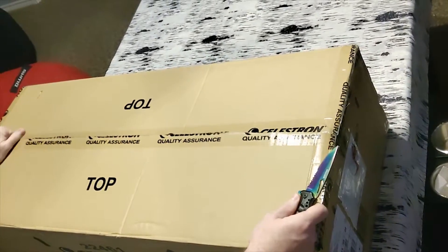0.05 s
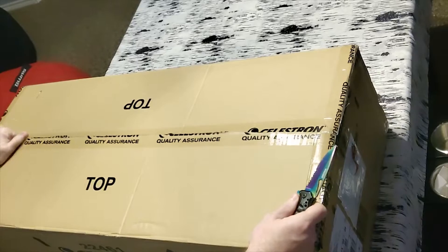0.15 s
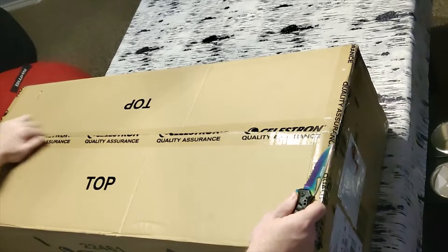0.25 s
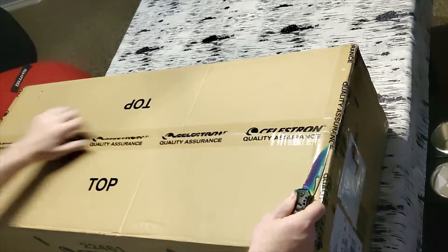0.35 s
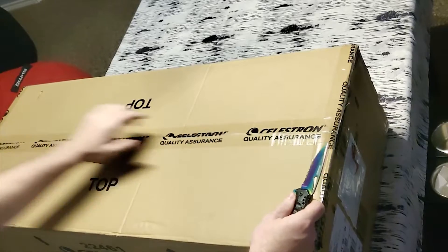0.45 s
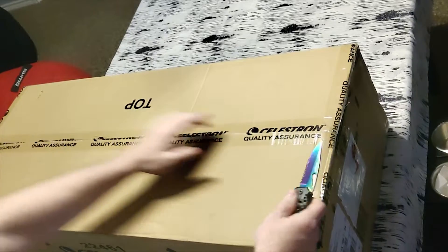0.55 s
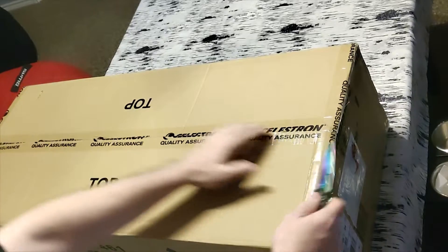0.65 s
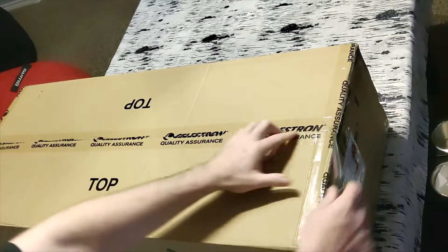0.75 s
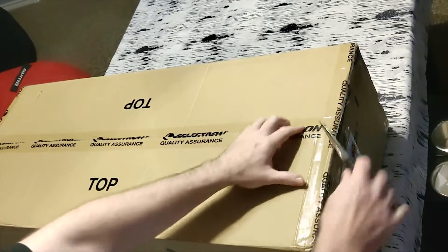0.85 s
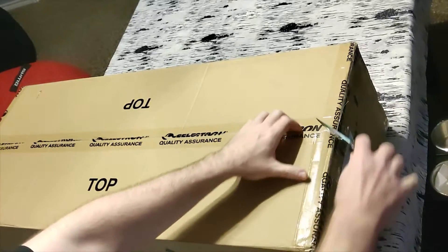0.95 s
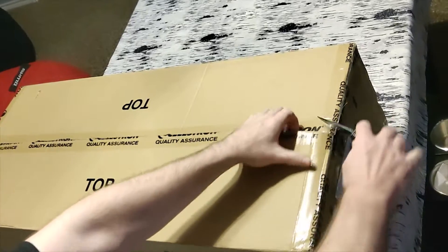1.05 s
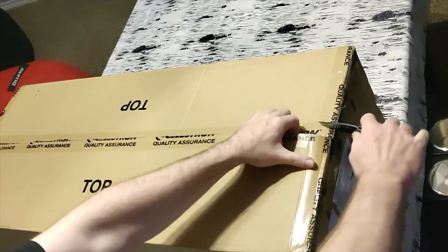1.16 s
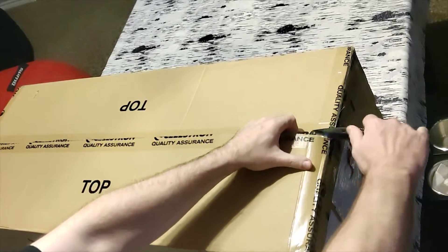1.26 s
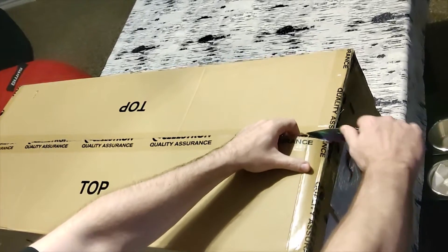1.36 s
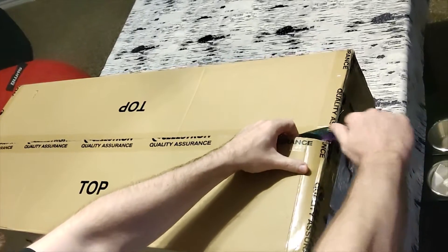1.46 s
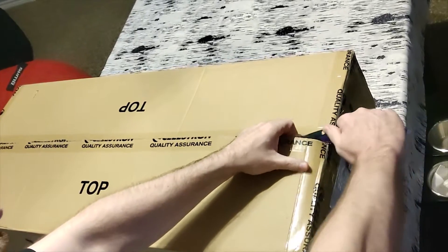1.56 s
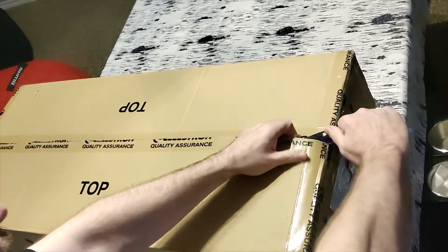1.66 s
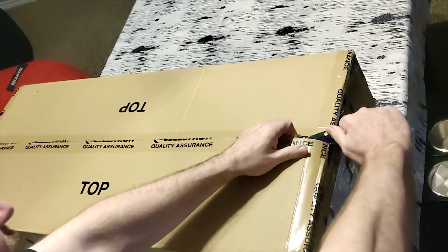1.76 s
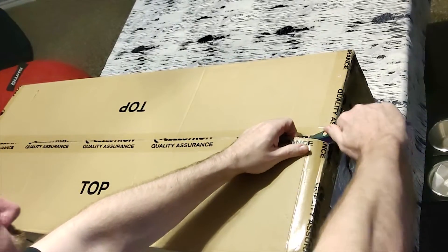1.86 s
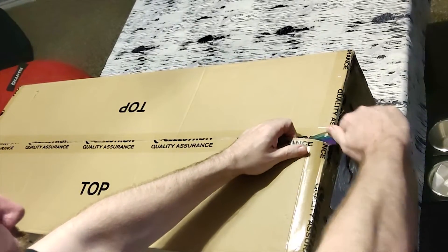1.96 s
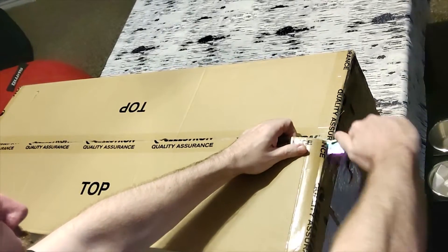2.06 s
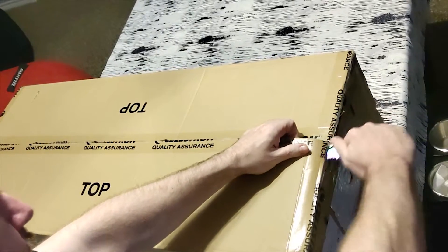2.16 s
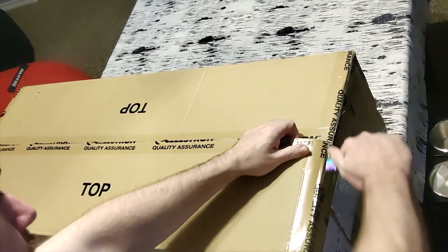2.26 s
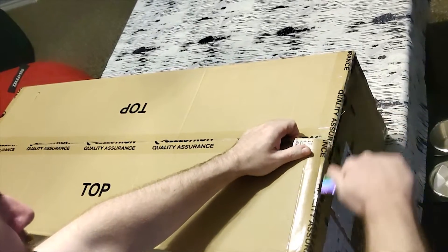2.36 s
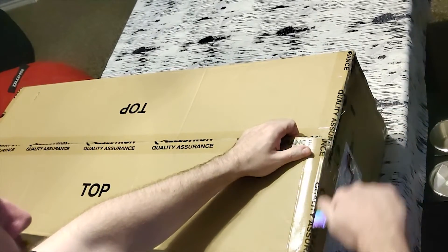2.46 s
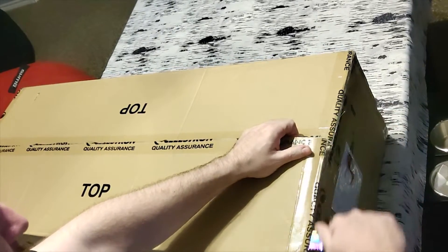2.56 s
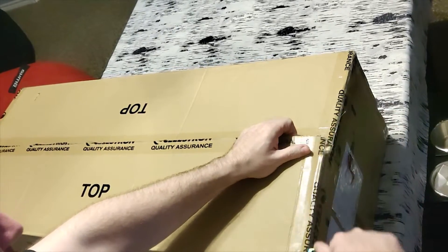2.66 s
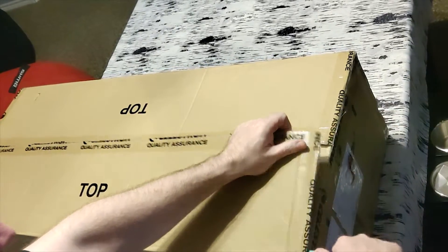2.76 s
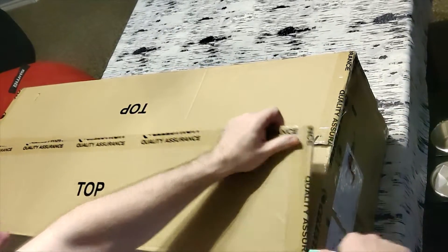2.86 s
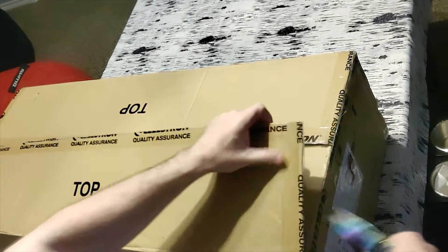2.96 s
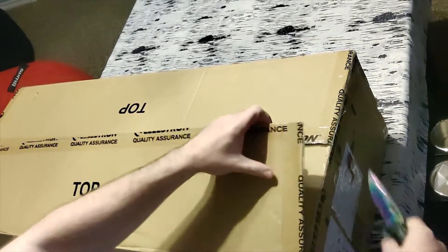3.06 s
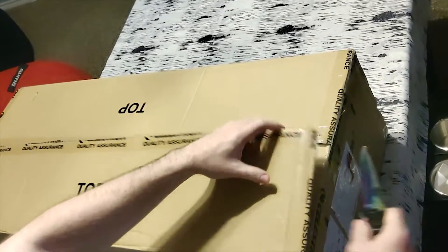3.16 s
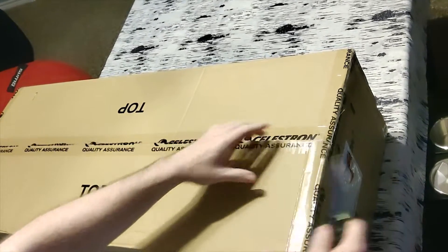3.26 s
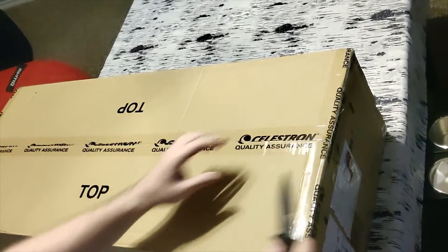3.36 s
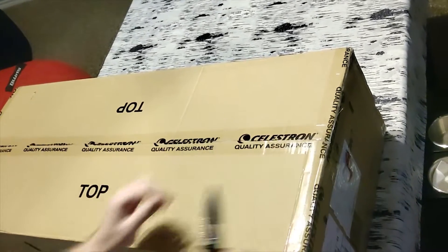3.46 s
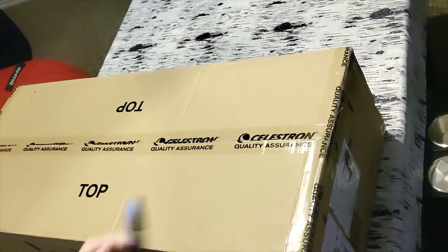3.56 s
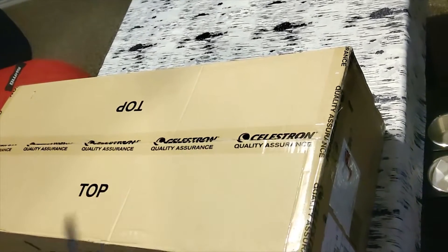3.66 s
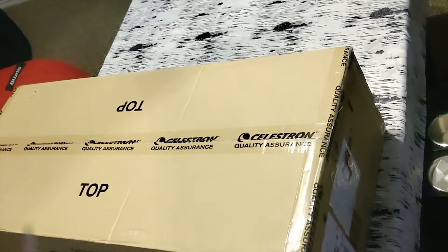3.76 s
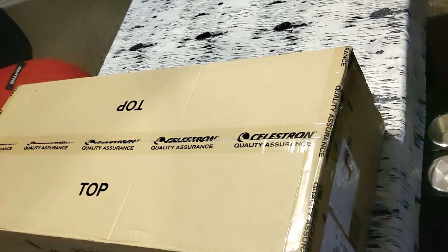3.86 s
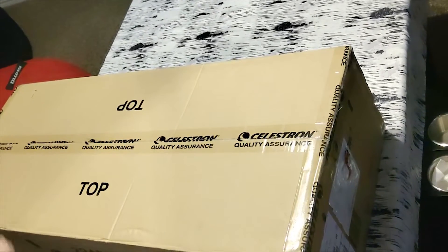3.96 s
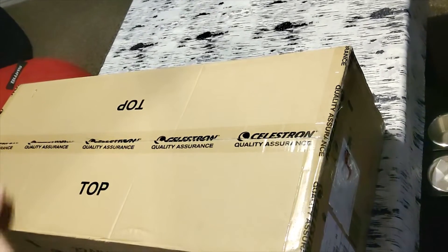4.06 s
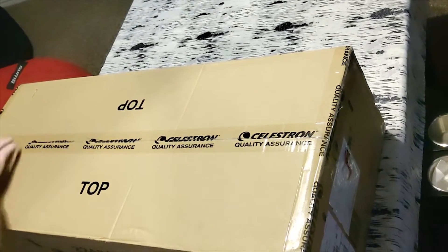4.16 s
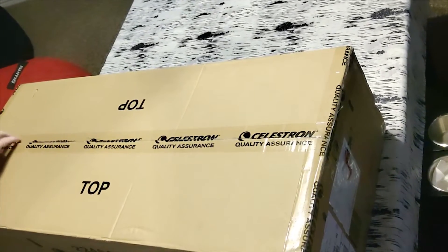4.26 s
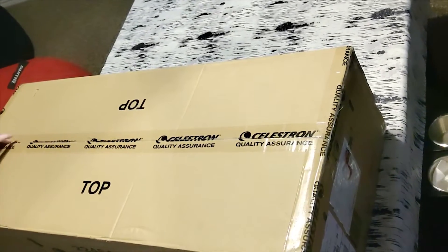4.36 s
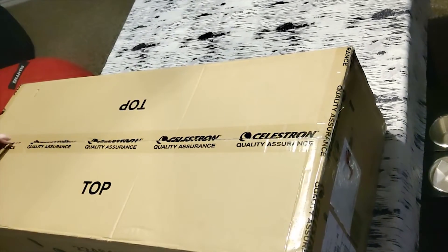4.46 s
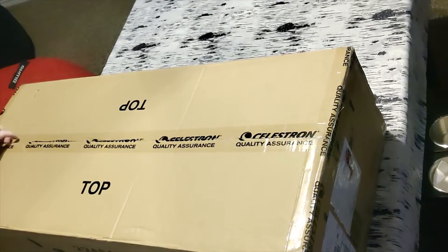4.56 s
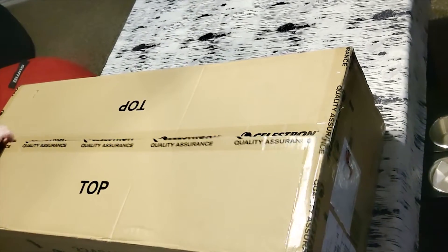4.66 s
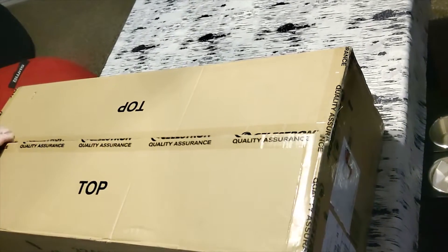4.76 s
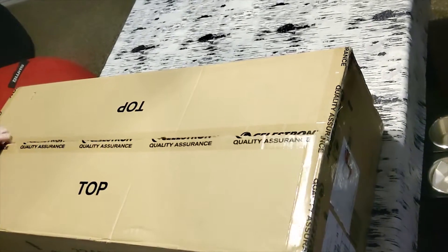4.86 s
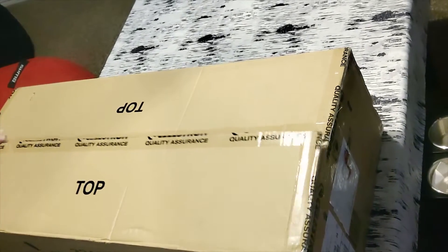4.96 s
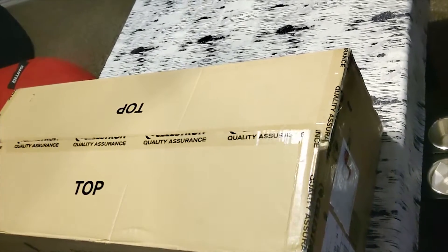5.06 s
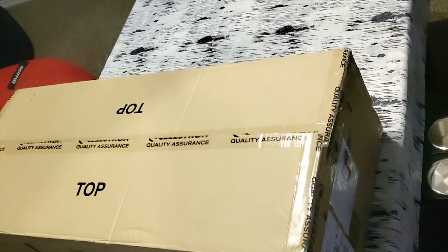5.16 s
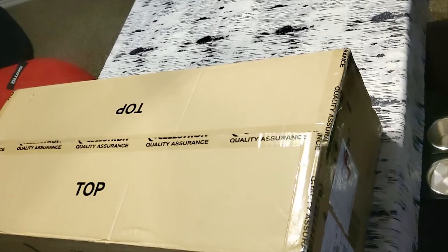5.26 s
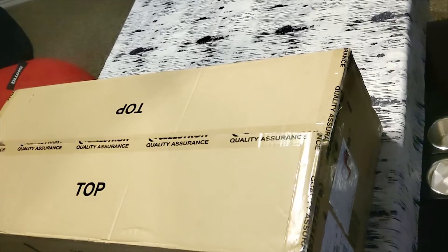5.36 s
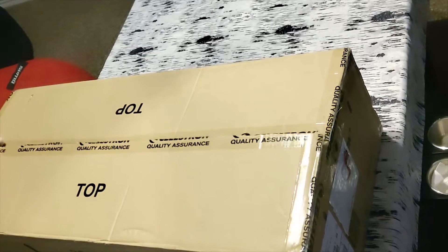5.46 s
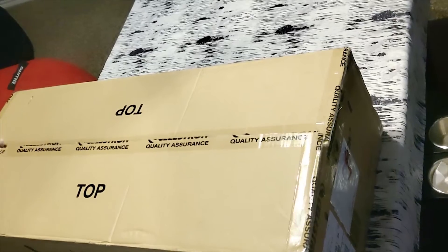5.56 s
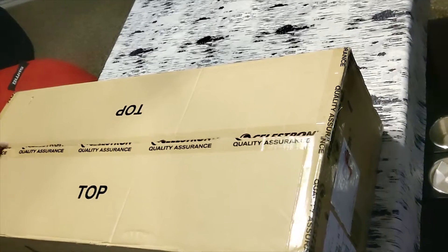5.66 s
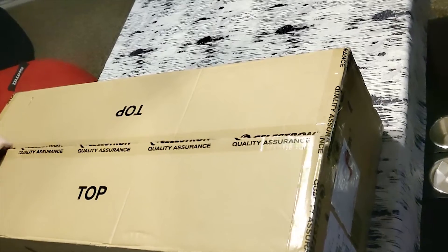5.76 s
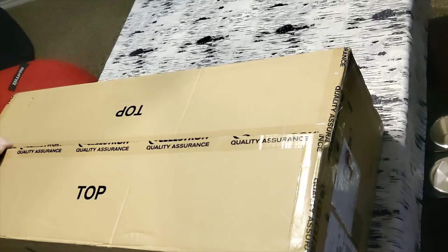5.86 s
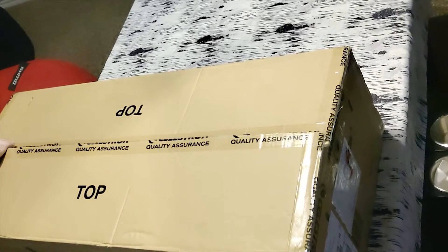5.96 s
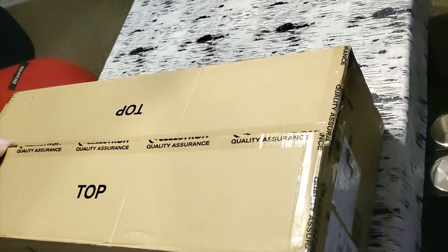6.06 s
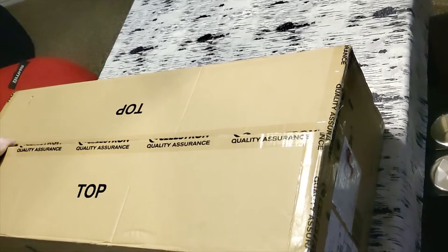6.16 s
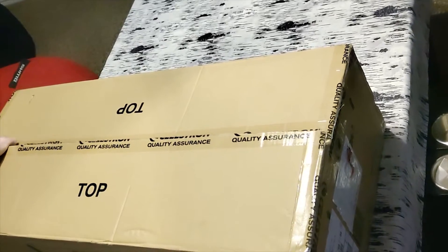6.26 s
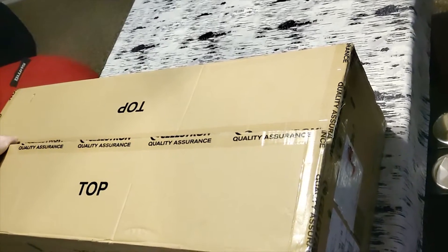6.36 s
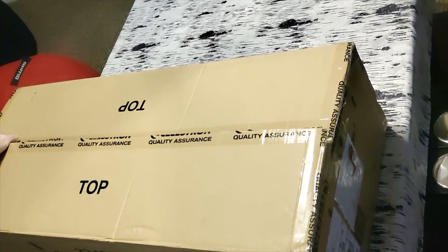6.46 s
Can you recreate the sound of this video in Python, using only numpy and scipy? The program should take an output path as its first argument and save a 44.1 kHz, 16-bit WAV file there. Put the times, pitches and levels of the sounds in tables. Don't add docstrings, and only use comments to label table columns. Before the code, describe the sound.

A large hollow cardboard box is cut open indoors, heard close in stereo with very faint ventilation hiss. At 0 s a bright tape snap and short scrape, then light fingertip whisks and tiny ticks around 0.2-0.9 s. From 1.0 to 1.25 s a rapid cluster of sharp cracks, leaning left. Faint ticks and creaks follow until 2.1 s, when the loudest crack bursts with a brief boxy ring and low thump; smaller snaps at 2.2-2.4 s and 2.5-2.65 s. Papery drags and soft knocks run 2.6-3.3 s. It is nearly quiet to 4.5 s, with a dull knock at 4.3 s. Then farther, roomier pops crackle at 4.6-4.9, 5.03-5.07 and 5.35-5.45 s, with brief rasps at 5.1 and 5.5 s. Quiet again, until a last double snap at 6.45 s. Echoes are short, tails cut off.

```python
import sys
import numpy as np
from scipy import signal
from scipy.fft import rfft, irfft
from scipy.io import wavfile

SR = 44100
rng = np.random.default_rng(int(sys.argv[2]) if len(sys.argv) > 2 else 0)


def voltage_ratio(decibels):
    exponent = np.asarray(decibels, float) / 20
    return 10 ** exponent


def wav_record(signal):
    frames = np.transpose(np.atleast_2d(signal))
    bounded = np.clip(frames, -1, 1)
    quanta = np.round(bounded * 32767).astype(np.int16)
    wavfile.write(sys.argv[1], SR, quanta)


N = 287532
TIME_S = np.arange(N) / SR

# start in seconds, peak in dB, box ring in Hz, crack re ring in dB, room send in dB.
SLITS = [(0.002, -32, 770, -9.5, 5), (0.044, -17, 1600, -41, -16.5), (0.997, -37, 1320, 2.5, -18),
         (1.041, -37, 1050, -15, 1), (1.0645, -19, 1540, -20, -13), (1.0801, -12, 1480, -20, -6.5),
         (1.1251, -22.5, 2360, -6.5, -16), (1.142, -21.5, 2580, -9, -6), (1.157, -14.5, 1450, -14.5, -5),
         (1.229, -32.5, 820, -2.5, -19), (2.064, -33.5, 1160, -10.5, -3.5), (2.095, -21.5, 760, -19.5, 2.5),
         (2.1144, -3.5, 883, -18.5, -4.5), (2.229, -27.5, 980, 4, -8), (2.255, -22, 1530, -1.5, -10.5),
         (2.26, -24, 780, -7.5, 1), (2.359, -18.5, 1950, -20.5, -7.5), (2.365, -22.5, 1440, -8, -8),
         (2.374, -34, 1490, -12, -13), (2.541, -27, 1130, -13, -7), (2.618, -30.5, 1940, -17, 3),
         (2.626, -23.5, 2220, -25, -18), (2.961, -34.5, 1630, -17.5, -8), (3.28, -34.5, 1540, -9, 1)]
POPS = [(4.584, -20, 1620, -13.5, -8.5), (4.64, -20, 1540, -12.5, -45), (4.698, -50.5, 996, 5, -11),
        (4.735, -36.5, 640, -19, 7), (4.747, -27.5, 830, -1, -2.5), (4.766, -17.5, 890, -4.5, -6.5),
        (4.800, -10, 1160, -8.5, -6.5), (4.818, -14, 1490, -11, -25), (4.867, -26.5, 1650, -3, -10.5),
        (4.886, -34, 2300, -2.5, -19), (4.957, -41, 1370, -20, -22), (5.031, -19, 1460, -11.5, -1),
        (5.0487, -13.5, 757, -7, -5.5), (5.067, -12, 1250, -17.5, -4.5), (5.299, -42.5, 830, -31, -3),
        (5.35, -20, 1675, -15.5, -12.5), (5.413, -10.5, 890, -8, -1.5), (5.434, -27, 1140, -13.5, 3.5),
        (5.619, -38, 786, -33, -8), (5.979, -50.5, 965, -19.5, -6.5), (6.44, -13.5, 1062, -20, -4),
        (6.457, -17.5, 1420, -40, -5)]
# start in seconds, peak in dB, box ring in Hz, crack re ring in dB.
TICKS = [(0.022, -42, 600, -29), (0.284, -35, 740, -30), (0.412, -49, 797, -3), (0.706, -45.5, 1540, -22),
         (0.85, -52, 900, -12), (0.899, -44.5, 880, 2.5), (0.989, -48, 1010, -7), (1.314, -43, 1150, -17),
         (1.346, -39, 1560, -9.5), (1.433, -43, 870, -13), (1.591, -46, 1550, -9), (1.737, -47, 557, -13),
         (1.854, -40, 910, -30), (1.887, -33.5, 855, -26), (1.928, -37, 830, -25), (2.048, -47.5, 1610, -7),
         (2.089, -58, 695, 15), (2.465, -50, 755, 7), (2.582, -44, 1110, -3.5), (2.597, -44, 850, -14),
         (2.748, -36.5, 960, -4), (2.9305, -44.5, 865, 9), (3.311, -35.5, 825, -15),
         (4.055, -39, 1730, -45), (4.303, -46.5, 930, -11), (5.591, -58, 800, -20.5),
         (5.893, -57, 523, -14), (5.991, -48, 837, -23), (6.235, -56, 512, -16)]
TICK_ROOM_DB = -3.5
# start in seconds, peak in dB, pitch in
# Hz, t60 in seconds, room send in dB.
OVERTONES = [(.005, -43, 644, 0.11, 0), (1.0657, -25, 1560, .006, -14), (1.0735, -32, 1500, .009, -10),
             (1.0793, -30, 2400, .004, -8), (1.0813, -24, 2530, 0.0038, -6), (1.088, -29, 1250, .009, -16),
             (1.1665, -27, 1620, .01, -10), (2.1228, -30, 6000, .004, -8), (5.032, -26, 1400, .008, -14),
             (5.446, -28, 950, .01, -12), (2.739, -42, 1410, .008, -4), (2.1172, -11.5, 684, 0.022, -14),
             (2.1167, -15.5, 1950, 0.0065, -11.5), (2.1163, -17, 4250, 0.006, -6),
             (2.231, -41, 3520, 0.0076, -23), (2.543, -29, 1950, 0.006, -8),
             (2.5825, -36, 2080, 0.0076, -3), (4.642, -28, 2650, 0.01, -13),
             (5.0508, -25, 1300, 0.013, -10), (2.115, -27, 1500, 0.015, -3),
             (4.587, -36.5, 1300, 0.0077, -2), (5.413, -22.5, 1265, 0.038, -20),
             (6.442, -30.5, 698, 0.015, 1), (6.443, -38.5, 545, 0.039, -2), (2.752, -45.5, 303, 0.06, -6),
             (6.443, -18.5, 1600, 0.0059, -18)]
# start in seconds, peak in dB, pitch in Hz,
# room send in dB.
FLECKS = [(.411, -47, 5300, -8), (1.0195, -39, 6200, -8), (1.0265, -45, 6500, -10), (1.046, -48, 6800, -8),
          (1.0828, -31, 6900, 3), (1.073, -32, 3500, -6), (1.143, -23.5, 2980, -15),
          (1.158, -32, 3480, -17), (2.2298, -27, 3720, -12), (2.273, -38, 4500, -13),
          (4.82, -18.5, 6200, -2), (1.1264, -26, 6830, -14), (1.1267, -28, 3400, -16),
          (4.768, -38, 14200, 0), (5.051, -32, 14300, 6), (5.069, -33, 4000, -8), (2.542, -40.5, 5030, -14),
          (3.29, -55, 13600, 4), (1.2305, -40, 7360, -8), (2.059, -51.5, 7990, -10.5),
          (2.089, -40.5, 9370, -5.5), (2.1156, -21.5, 5960, -13), (2.2647, -29, 4300, -19),
          (2.266, -26, 5600, -11), (2.466, -39, 7400, -10), (2.926, -36, 7000, -7), (2.932, -38, 5600, -6),
          (3.31, -37.5, 6430, -2.5), (4.645, -39, 6600, -1), (4.661, -41, 6800, -3.5),
          (4.749, -38, 14000, -5), (4.808, -27.5, 9560, -9.5), (4.81, -24, 4840, -11.5),
          (4.868, -36, 14000, -10), (4.89, -27.5, 6200, -8.5), (4.906, -39.5, 4000, -12),
          (5.036, -35.5, 7820, -4), (5.056, -22, 8530, -5), (5.07, -25, 8600, -6), (5.414, -27, 13500, 4.5),
          (5.42, -27, 8000, -6), (5.436, -41, 9000, -4), (5.443, -24.5, 4000, -1), (5.459, -47, 4500, -10),
          (5.896, -52.5, 3210, -12), (5.981, -59, 4500, -9), (5.999, -58, 4000, -7), (6.443, -36, 7560, -6),
          (6.461, -37, 7200, -9),
          (5.033, -40, 14200, 0), (5.038, -36, 7600, -10), (5.057, -38, 15000, 4),
                 (5.07, -38, 13600, 3), (4.803, -40, 15000, 3), (4.809, -39, 13300, 3),
                 (4.85, -48, 15000, 6), (5.4355, -36, 13600, 3), (5.415, -38, 15200, 4),
                 (2.739, -44, 5200, -4), (2.668, -48, 5000, -3), (4.586, -38, 6200, -3),
                 (2.257, -42, 13500, -4)]
FLECK_CYCLES, FLECK_DB = 14, 7
# pitch in Hz, level in dB, t60 in seconds.
BOX_PANELS = [(945, -6.5, 0.022), (1250, -12.5, 0.0044), (1950, -10.5, 0.018), (2360, -10, 0.016),
              (4000, -24, 0.018)]
# frequency in Hz, level in dB per Hz.
NEAR_CRACK_SPECTRUM = [(710, -36), (1200, -10), (1560, -6.5), (2750, -12.5), (3830, -1.5), (5020, -5.5),
                       (6870, -5), (11800, -25.5), (13500, -38), (16000, -49)]
# frequency in Hz, level in dB per Hz.
FAR_CRACK_SPECTRUM = [(710, -26), (1200, -0.5), (2320, -2.5), (3910, -2.5), (5900, -3), (9010, -9.5),
                      (12200, -22.5), (14500, -33), (16000, -36)]
# frequency in Hz, level in dB.
BOX_SHADOW = [(3000, 1), (6000, -4), (9000, -6), (14000, -7.5)]
FAR_FROM_S = 4.5
NEAR_CRACK_S, FAR_CRACK_S, FAR_DIRECT_DB = 0.0062, 0.014, -4.5
NEAR_PAN_DB, FAR_PAN_DB, PAN_SCATTER_DB = 7, 1.5, 2.5

NEAR_ECHO_S, FAR_ECHO_S = 0.0072, 0.006
NEAR_ECHO_DB, RING_ECHO_DB = [[-5.5], [-11.5]], -3
# level in dB, left port then right.
FAR_ECHO_DB = [
    [-7.5],
    [-3],
]

# band centre in Hz, t60 in seconds, level in dB.
ROOM_BANDS = [(150, 0.19, 5), (760, 0.56, -7), (1575, 0.25, -3), (4000, 0.45, -1.5), (9000, 0.18, -9.5),
              (13800, 0.3, -3)]
# frequency as a ratio to the centre, level in dB (None: band level).
ROOM_SKIRT = [(1 / 9, -40), (1 / 2.18, -14), (1, None), (2.84, -14), (9, -40)]
KNIFE_MOVES_S = [0, 1.9, 2.2, 4.5, 4.79, 5.0, 5.3, 6.0]
LUMPS_PER_S, LUMPS_DB, LUMPS_FADE_S = 300, 2.5, 0.074
# start in seconds, drop in
# dB per 7.5 ms (lasting 19 ms).
SUPPRESSOR_CLOSES = [(.075, 0), (.92, 3), (1.182, 4.5), (1.26, 1), (2.178, 1), (2.212, 1), (2.302, 4),
                     (2.385, 1), (2.64, -1), (4.61, -1), (4.664, 0), (4.914, 2.5), (5.165, 35), (5.565, 7)]

# time in seconds, rasp level in dB.
STIR = [(0, -75.5), (.42, -58.5), (.48, -80), (.8, -71.5), (1.0, -76), (1.42, -70.5), (1.8, -65.5),
        (1.95, -73.5), (2.12, -71), (3.0, -70), (3.5, -71), (4.03, -67.5), (4.57, -71.5), (5.3, -62.5),
        (5.77, -68), (5.96, -77), (6.21, -79), (6.52, -68.5)]
STIR_MEAN_DB = -72
HISS_DB, HISS_FOLLOWS = -74, 0.98
RUMBLE_DB, RUMBLE_FOLLOWS = -83.5, 0.8
# start in seconds, hold in seconds, rasp in dB, hiss in dB, rumble in dB.
STROKES = [(0, 0.017, -56, -78, -69), (0.237, 0.14, -64.5, -58, -88), (1.03, 0.1, -64, -57, -73),
           (1.226, 0.03, -59, -61, -76), (2.21, 0.06, -51.5, -58, -72.5), (2.364, 0.3, -58, -60, -69.5),
           (2.756, 0.1, -60, -66.5, -69.5), (2.968, 0.13, -89, -63, -90), (4.348, 0.067, -70, -84, -74),
           (4.675, 0.01, -95, -57, -78), (4.792, 0.052, -51, -63, -65.5), (5.128, 0.017, -51.5, -50, -68.5),
           (5.502, 0.016, -54.5, -50.5, -70), (5.734, 0.069, -70.5, -68.5, -93)]
PRESS_DB_PER_S, LIFT_DB_PER_S = 149.5, 121
# start in seconds, rise in seconds, length in seconds, rasp in dB, hiss in dB.
DRAGS = [(0.0, 0.00027, 0.066, -49, -49.5), (0.711, 0.0084, 0.079, -72, -63.5),
         (1.328, 0.019, 0.039, -70, -61), (1.418, 0.0093, 0.033, -63, -66.5),
         (2.575, 0.0063, 0.017, -50, -67), (2.613, 0.0064, 0.016, -54, -62),
         (2.663, 0.0087, 0.021, -54.5, -55.5), (2.697, 0.051, 0.055, -48, -50),
         (2.905, 0.01, 0.059, -59.5, -54.5), (3.155, 0.016, 0.075, -65.5, -60.5),
         (3.216, 0.062, 0.095, -54, -52.5), (4.052, 0.0075, 0.014, -57, -98),
         (4.289, 0.0091, 0.028, -62.5, -69), (5.337, 0.0075, 0.048, -57.5, -59.5),
         (5.973, 0.0065, 0.028, -65.5, -75)]
# time in seconds, fizz level in dB.
FINGER_SWIPE = [
    (.17, -100),
    (.22, -68),
    (.29, -69),
    (.335, -70),
    (.36, -105),
]
# frequency in Hz, level in dB per Hz.
RASP_SPECTRUM = [(150, -29.5), (250, -13.5), (371, -10.5), (429, -5), (853, -4), (1330, -4.5), (2000, -7),
                 (3000, -11.5), (3900, -33.5), (6600, -120)]
# frequency in Hz, level in dB per Hz.
HISS_SPECTRUM = [(1290, -31.5), (2200, -10), (2760, -2), (6440, -2), (7950, -8), (9900, -17), (11100, -14),
                 (12600, -25), (16400, -52.5), (22000, -120)]
# frequency in Hz, level in dB per Hz.
FIZZ_SPECTRUM = [(4000, -70.5), (9500, -31.0), (11000, 1.0), (13500, -3.0), (15300, 2.0), (16000, -56.5)]
# frequency in Hz, level in dB per Hz.
RUMBLE_SPECTRUM = [(35, -30.5), (70, -4.5), (130, 3.5), (280, -1.0), (380, -38.5), (1500, -100)]

# start in seconds, length in seconds, level in dB, panel pitch in Hz.
CREAKS = [(0.074, 0.13, -75, 810), (0.195, .03, -63, 750), (.375, 0.025, -62, 746), (1.09, .02, -46, 1360),
          (1.335, 0.031, -63, 1500), (1.43, 0.023, -58, 900), (1.436, 0.03, -62, 1570),
          (1.6, 0.033, -65.5, 1460), (1.73, 0.044, -75, 560), (2.468, 0.044, -62, 620),
          (2.582, 0.041, -54.5, 830), (2.608, 0.042, -62, 700), (2.532, 0.017, -54, 1910),
          (2.579, 0.018, -50, 2120), (2.621, .006, -48, 2020), (2.117, .05, -43, 1870),
          (3.046, 0.17, -75, 560), (3.171, 0.033, -63, 860), (3.225, .05, -59.5, 910),
          (3.85, 0.14, -74, 2600), (5.435, 0.011, -43, 805), (5.676, 0.02, -62, 820),
          (5.927, 0.015, -68, 1190), (6.462, .03, -52.5, 1300)]
CREAK_WIDTH, CREAK_EDGE_S = 0.31, 0.0071

# start in seconds, peak in dB, pitch in Hz.
THUMPS = [(0.289, -63, 109), (0.337, -54, 150), (0.387, -51.5, 172), (0.71, -69, 75), (1.048, -63, 196),
          (1.161, -56, 162), (1.316, -56.5, 139), (2.117, -54, 195), (2.131, -39, 159), (2.259, -58, 106),
          (2.368, -72, 129), (2.753, -49.5, 195), (2.792, -55, 184), (3.278, -55, 133), (4.306, -45.5, 135),
          (4.749, -55, 183), (4.801, -71.5, 205), (4.881, -52, 122), (5.049, -52, 104), (5.097, -84, 165),
          (5.414, -50, 174), (6.445, -54.5, 110), (1.932, -65, 131), (2.782, -58, 84), (3.361, -63, 170),
          (4.65, -63, 80)]
WALL_LOW_RATIO, WALL_LOW_DB = 0.85, -6

# frequency in Hz, level in dB per Hz.
AIR_SPECTRUM = [(20, -52), (50, -7.5), (120, -18), (300, -7.5), (470, -5.5), (525, 1.5), (585, -4.5),
                (1200, -14.5), (3000, -14.5), (6500, -25.5), (9500, -28), (10600, -44), (13000, -85.5)]
AIR_DB, AIR_FOLLOWS, AIR_TOP_DB = -69.5, 0.34, -62

# frequency in Hz, left-right likeness from 0 to 1.
LIKENESS = [(60, 0.94), (200, 0.94), (330, 0.8), (450, 0.8), (700, 0.48), (1500, 0.12), (4000, 0.021)]
# time in seconds, lag in samples.
HAND_LAG = [
    (0, 5.5),
    (.5, -4),
    (.8, -5),
    (3.5, -2),
    (4.0, 11),
    (6.52, 7),
]
# time in seconds, level towards the left in dB.
HAND_PAN = [(0, 0), (.55, 2), (.95, 3), (1.06, -2.5), (1.95, 0), (2.1, -2.5), (2.5, 1.5), (4.6, 0),
            (5.4, 1), (5.6, -1.5), (6.52, 0)]
# frequency in Hz, level over the right port in dB.
LEFT_PORT = [(300, 1), (700, -1.5), (1500, 2), (4000, -0.5), (8000, 2.5), (12000, 1)]


def rms_one(x):
    return x / np.sqrt(np.mean(x ** 2) + 1e-20)


def in_time(rows):
    s, *columns = np.transpose(rows)
    return [np.interp(TIME_S, s, column) for column in columns]


def at_hz(points, x):
    hz = np.arange(1, x.shape[-1] // 2 + 2) * SR / x.shape[-1]
    table_hz, table_db = np.array(points).T
    return np.interp(np.log(hz), np.log(table_hz), table_db)


def colour(x, spectrum):
    return irfft(rfft(x) * voltage_ratio(at_hz(spectrum, x)), x.shape[-1])


def highpass(x, hz):
    return signal.sosfilt(signal.butter(2, hz, "high", fs=SR, output="sos"), x)


def diffuse(mid, side):
    alike = np.clip(at_hz(LIKENESS, mid), -1, 1)
    a = rfft(mid) * np.sqrt(1 + alike)
    b = rfft(side) * np.sqrt(1 - alike)
    return irfft(np.array([a + b, a - b]), len(mid)) / np.sqrt(2)


def flicker(rate_per_s, depth_db):
    knots = rng.standard_normal(400)
    return voltage_ratio(depth_db * np.interp(TIME_S * rate_per_s, np.arange(400), knots))


def ring(t, hz, t60_s):
    return np.sin(2 * np.pi * hz * t) * voltage_ratio(-60 * t / t60_s)


def add(out, x, start_s):
    i = max(round(start_s * SR), 0)
    out[:, i:i + x.shape[-1]] += x[..., :N - i]


def grains(per_s, spread_db):
    sizes = voltage_ratio(spread_db * np.minimum(rng.exponential(1, (2, N)), 4))
    sizes = sizes * rng.choice([-1, 1], (2, N))
    slips = rms_one(sizes * (rng.random(N) < per_s / SR))
    return slips + 0.53 * rng.standard_normal((2, N))


def strokes():
    stir_db, = in_time(STIR)
    swing_db = stir_db - STIR_MEAN_DB
    hiss_db = HISS_DB + HISS_FOLLOWS * swing_db
    rumble_db = RUMBLE_DB + RUMBLE_FOLLOWS * swing_db
    power = voltage_ratio([stir_db, hiss_db, rumble_db]) ** 2
    for s, hold_s, *levels_db in STROKES:
        press_db = -PRESS_DB_PER_S * np.maximum(s - TIME_S, 0)
        lift_db = -LIFT_DB_PER_S * np.maximum(TIME_S - s - hold_s, 0)
        power += voltage_ratio(press_db + lift_db) ** 2 * voltage_ratio(levels_db)[:, None] ** 2
    return np.sqrt(power)


def air():
    contact_db = 20 * np.log10(strokes()[0])
    air_db = np.minimum(AIR_DB + AIR_FOLLOWS * (contact_db - STIR_MEAN_DB), AIR_TOP_DB)
    white = diffuse(*rng.standard_normal((2, N)))
    return rms_one(colour(white, AIR_SPECTRUM)) * voltage_ratio(air_db)


def drags():
    gains = np.zeros((2, N))
    for s, rise_s, length_s, rasp_db, hiss_db in DRAGS:
        swell = np.clip((TIME_S - s) / rise_s, 0, 1)
        fade = np.exp(-np.clip(TIME_S - s - length_s, 0, 1) / 0.0064)
        gains += swell * fade * voltage_ratio([[rasp_db], [hiss_db]])
    return gains


def rubbing():
    rasp_gain, hiss_gain, rumble_gain = strokes()
    fizz_db, = in_time(FINGER_SWIPE)
    rasp_drag, hiss_drag = drags()
    unevenness = flicker(30, depth_db=0.6)
    rasp = rms_one(colour(diffuse(*grains(1800, spread_db=2.0)), RASP_SPECTRUM))
    rasp = rasp * (rasp_gain + rasp_drag) * flicker(40, depth_db=1.5)
    hiss = rms_one(colour(diffuse(*grains(3000, spread_db=-1.5)), HISS_SPECTRUM))
    hiss = hiss * (hiss_gain + hiss_drag)
    white = diffuse(*rng.standard_normal((2, N)))
    fizz = rms_one(colour(white, FIZZ_SPECTRUM)) * voltage_ratio(fizz_db)
    rumble = rms_one(colour(white, RUMBLE_SPECTRUM)) * rumble_gain
    return unevenness * (rasp + hiss + fizz) + rumble


def all_snaps():
    ticks = [(*row, TICK_ROOM_DB) for row in TICKS]
    return sorted([tuple(row) for row in SLITS] + [tuple(row) for row in POPS] + ticks)


def crack_noise(t, noise, is_far, pan_db):
    crack_s, direct_db = (FAR_CRACK_S, FAR_DIRECT_DB) if is_far else (NEAR_CRACK_S, 0)
    both, left, right = noise
    crack = 0.38 * both + 0.72 * np.array([left, right])
    crack = crack * voltage_ratio(-60 * t / crack_s) * (1 - np.exp(-t / 0.00042))
    if not is_far:
        crack[:, 8] -= 2.5
    click = np.sqrt(np.mean(crack ** 2) * len(t)) * (t == 0)
    ports = crack * voltage_ratio(direct_db) * voltage_ratio([[pan_db / 2], [-pan_db / 2]])
    return np.vstack([ports, click])


def echo(x, far, near_db):
    out = np.zeros_like(x)
    add(out, x * ~far * voltage_ratio(near_db), NEAR_ECHO_S)
    add(out, x * far * voltage_ratio(FAR_ECHO_DB), FAR_ECHO_S)
    return out


def snaps():
    t, rows = np.arange(1024) / SR, all_snaps()
    rings, cracks = np.zeros((2, 3, N))
    draws = rng.random((len(rows), len(BOX_PANELS) + 1))
    noises = rng.standard_normal((len(rows), 3, 1024))
    for (s, db, hz, crack_db, room_db), draw, noise in zip(rows, draws, noises):
        start_s, is_far = s + 0.0012, s > FAR_FROM_S
        pan_db = (FAR_PAN_DB if is_far else NEAR_PAN_DB) + PAN_SCATTER_DB * (2 * draw[-1] - 1)
        panels = 0
        for (panel_hz, panel_db, t60_s), chance in zip(BOX_PANELS, draw):
            panels = panels + voltage_ratio(panel_db - 20.0 * chance) * ring(t, panel_hz, t60_s)
        body = ring(t, hz, 11.7 / hz) + panels
        body = body * voltage_ratio(db - 3.0) * (1 - np.exp(-t / 0.00067))
        knock = voltage_ratio(db + room_db + 0.5) * (ring(t, hz, 3.7 / hz) + 0.21 * panels)
        crack = voltage_ratio(db + crack_db + 16.5) * crack_noise(t, noise, is_far, pan_db)
        add(rings, np.array([body, body, knock]), start_s)
        add(cracks, crack * voltage_ratio([[0], [0], [room_db]]), start_s)
    for s, db, hz, t60_s, room_db in OVERTONES:
        add(rings, ring(t, hz, t60_s) * voltage_ratio(db + np.array([[0], [0], [room_db]])), s)
    for s, db, hz, room_db in FLECKS:
        fleck = ring(t, hz, FLECK_CYCLES / hz) * (1 - np.exp(-t * hz / 0.7)) * voltage_ratio(FLECK_DB)
        add(rings, fleck * voltage_ratio(db + np.array([[1.5], [-1.5], [room_db]])), s)
    far = TIME_S > FAR_FROM_S
    cracks = colour(cracks * ~far, NEAR_CRACK_SPECTRUM) + colour(cracks * far, FAR_CRACK_SPECTRUM)
    rings = 0.21 * rings + highpass(rings, 260)
    rings = -highpass(rings, 55)
    send = rings[2] + cracks[2]
    direct = rings[:2] + cracks[:2] * ~far + colour(cracks[:2] * far, BOX_SHADOW)
    returned = echo(cracks[:2] + voltage_ratio(RING_ECHO_DB) * rings[:2], far, NEAR_ECHO_DB)
    return direct + returned, send


def room(send):
    t, out = np.arange(32768) / SR, np.zeros((2, N))
    white = diffuse(*rng.standard_normal((2, len(t))))
    lumps = flicker(LUMPS_PER_S, depth_db=LUMPS_DB) ** np.exp(-TIME_S / LUMPS_FADE_S)
    build_up = np.clip((t - 0.003) / 0.0031, 0, 1)
    bands = []
    for hz, t60_s, db in ROOM_BANDS:
        spectrum = [(hz * ratio, db if skirt_db is None else skirt_db) for ratio, skirt_db in ROOM_SKIRT]
        bands.append((colour(white, spectrum), t60_s))
    ends_s = [*KNIFE_MOVES_S[1:], N / SR]
    for k, (start_s, end_s) in enumerate(zip(KNIFE_MOVES_S, ends_s)):
        tail = sum(np.roll(band, -4096 * k, axis=1) * voltage_ratio(-60 * t / t60_s) for band, t60_s in bands)
        tail = tail * lumps[:len(t)] * build_up
        part = send[None, round(start_s * SR):round(end_s * SR)]
        add(out, signal.fftconvolve(tail, part, axes=1), start_s)
    return out * voltage_ratio(-28.5)


def suppressor():
    gain_db = np.zeros(N)
    opens_s = np.array([row[0] for row in all_snaps()] + [N / SR])
    for s, depth_db in SUPPRESSOR_CLOSES:
        until_s = opens_s[opens_s > s][0]
        gain_db -= depth_db * np.clip((TIME_S - s) / 0.0075, 0, 2.5) * (TIME_S < until_s)
    return voltage_ratio(gain_db)


def creaks():
    out, slips = np.zeros((2, N)), diffuse(*grains(700, spread_db=5.0))
    for s, length_s, db, hz in CREAKS:
        part = slice(int((s - 0.03) * SR), int((s + length_s + 0.05) * SR))
        t = TIME_S[part]
        edges_hz = [hz / (1 + CREAK_WIDTH / 2), hz * (1 + CREAK_WIDTH / 2)]
        band = signal.butter(1, edges_hz, "band", fs=SR, output="sos")
        swell = np.clip((t - s) / CREAK_EDGE_S, 0, 1)
        fade = np.exp(-np.clip(t - s - length_s, 0, 1) / CREAK_EDGE_S)
        sung = rms_one(signal.sosfilt(np.vstack([band, band]), slips[:, part]))
        out[:, part] += voltage_ratio(db) * swell * fade * sung
    return out


def thumps():
    t, out = np.arange(8000) / SR, np.zeros((2, N))
    for s, db, hz in THUMPS:
        wall = ring(t, hz, 0.09) * (1 - np.exp(-t / 0.0095))
        low_wall = ring(t, hz * WALL_LOW_RATIO, 0.18) * (1 - np.exp(-t / 0.0065))
        add(out, voltage_ratio(db + 5.5) * wall, s)
        add(out, voltage_ratio(db + WALL_LOW_DB) * low_wall, s)
    return out


def placed(x):
    lag_samples, = in_time(HAND_LAG)
    pan_db, = in_time(HAND_PAN)
    heard = np.clip(np.arange(N) - np.round(lag_samples).astype(int), 0, N - 1)
    return np.array([x[0, heard], x[1]]) * voltage_ratio([pan_db / 2, -pan_db / 2])


def scene():
    direct, send = snaps()
    at_hands = placed(direct + room(send) * suppressor() + rubbing())
    return at_hands + thumps() + air() + placed(creaks())


def roll_off(x):
    return signal.sosfilt(signal.butter(12, 16470, fs=SR, output="sos"), x)


def record(dry):
    ports = np.array([colour(dry[0], LEFT_PORT), dry[1]])
    ports = signal.sosfilt(signal.cheby2(10, 50, 16700, fs=SR, output="sos"), ports)
    return roll_off(ports)


dry = scene()
out = record(dry)
wav_record(out)
```